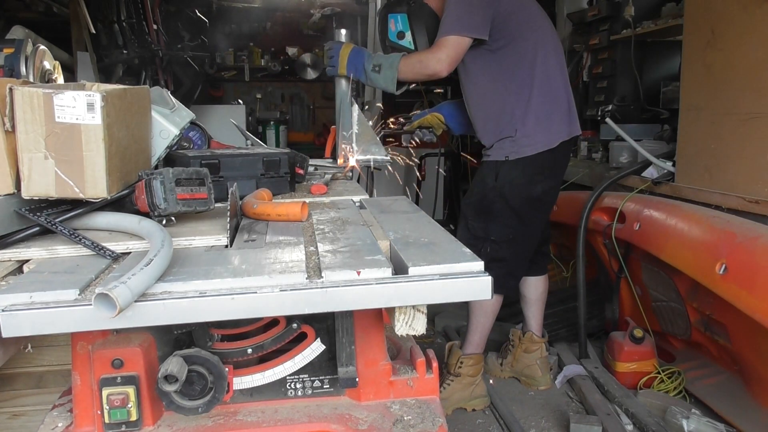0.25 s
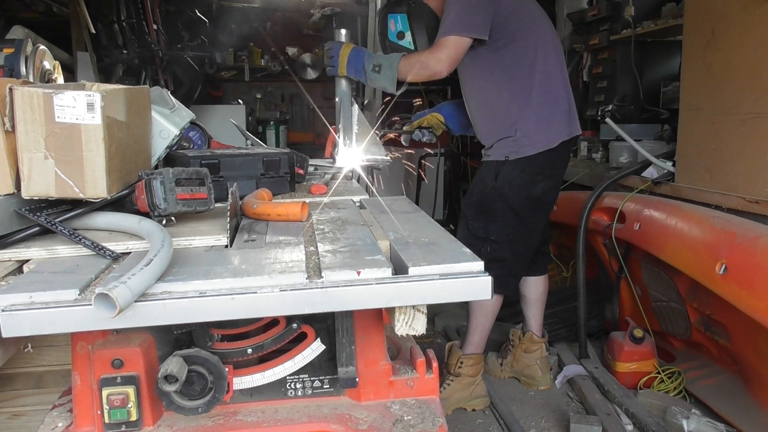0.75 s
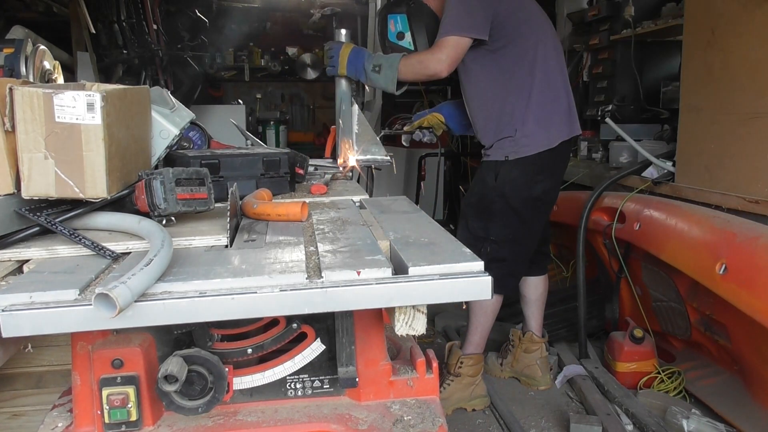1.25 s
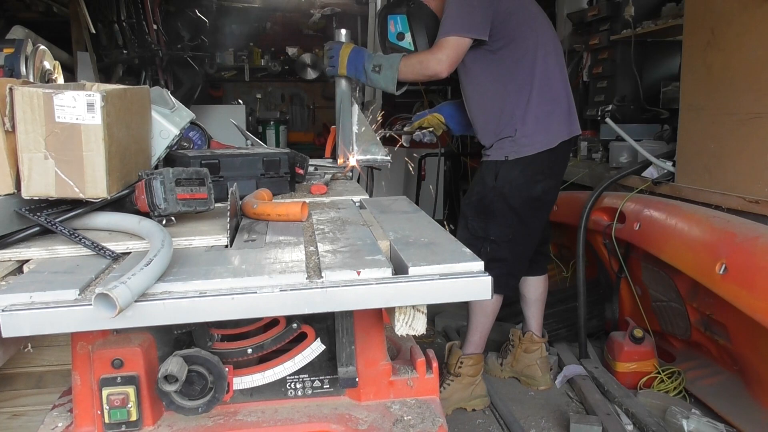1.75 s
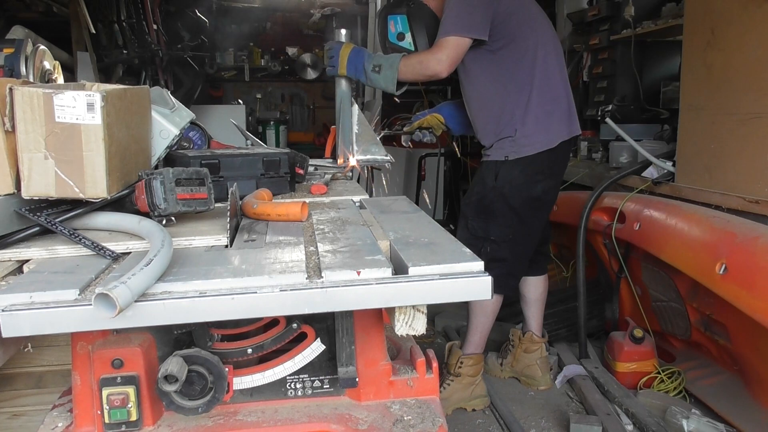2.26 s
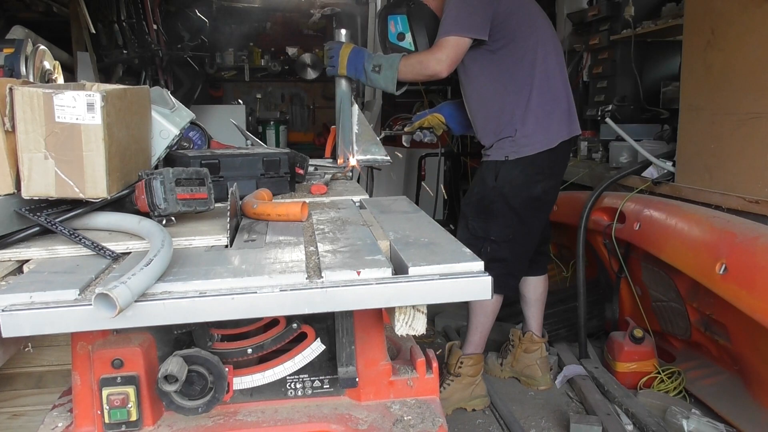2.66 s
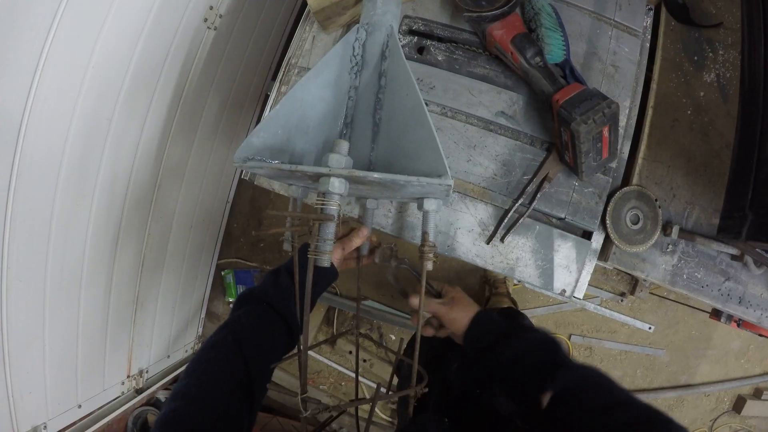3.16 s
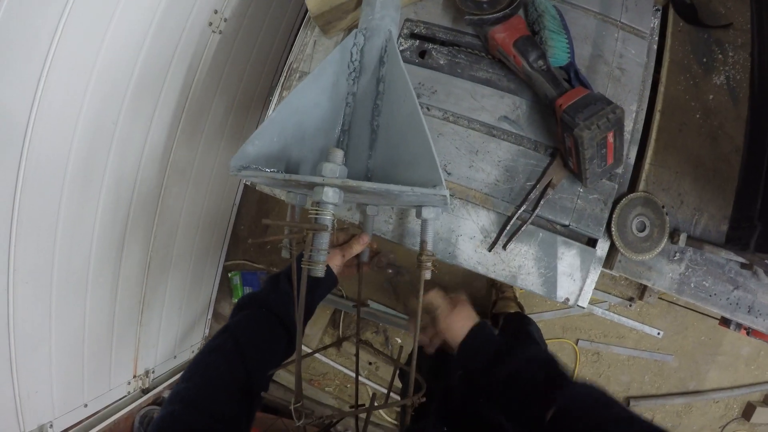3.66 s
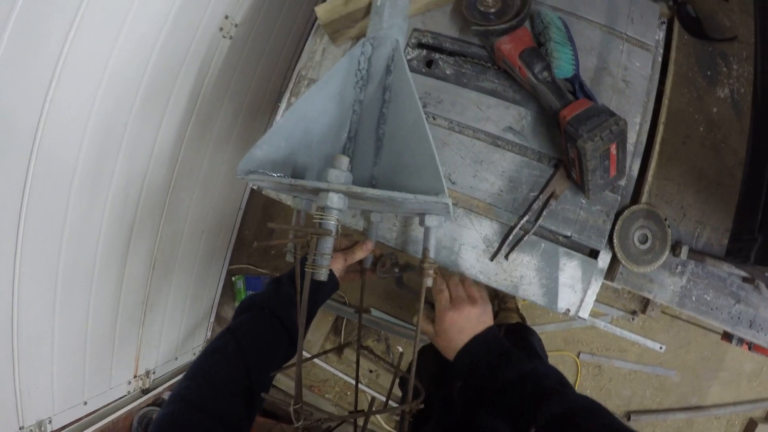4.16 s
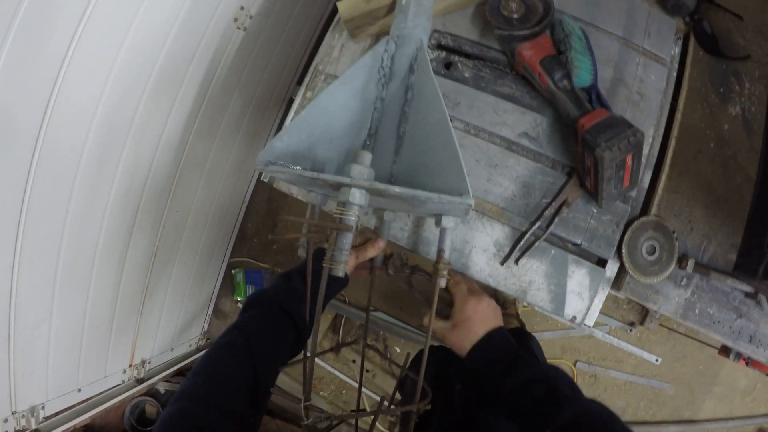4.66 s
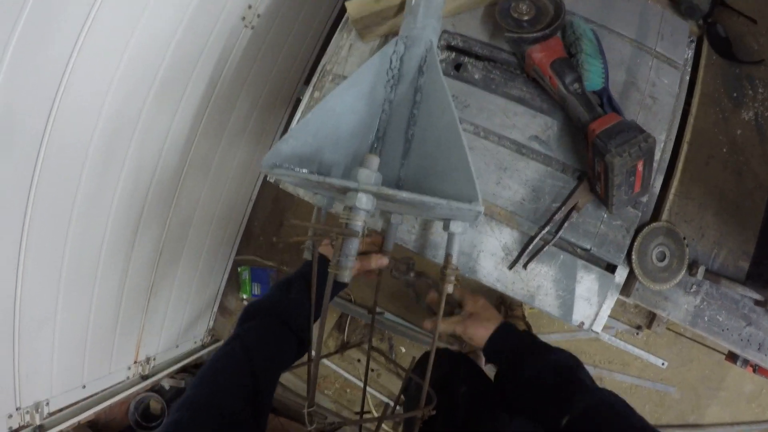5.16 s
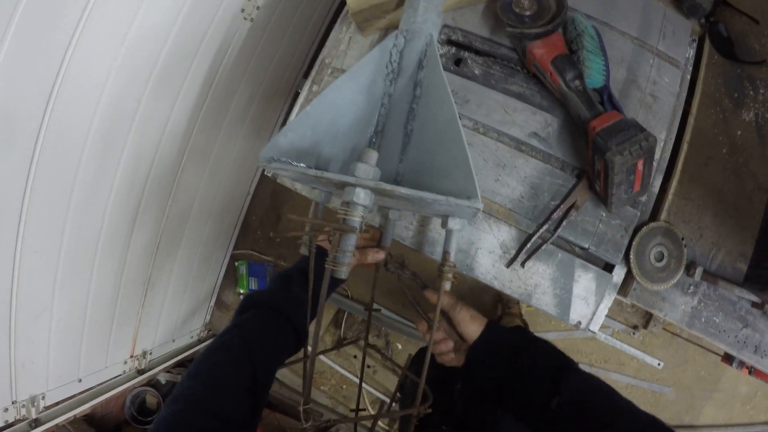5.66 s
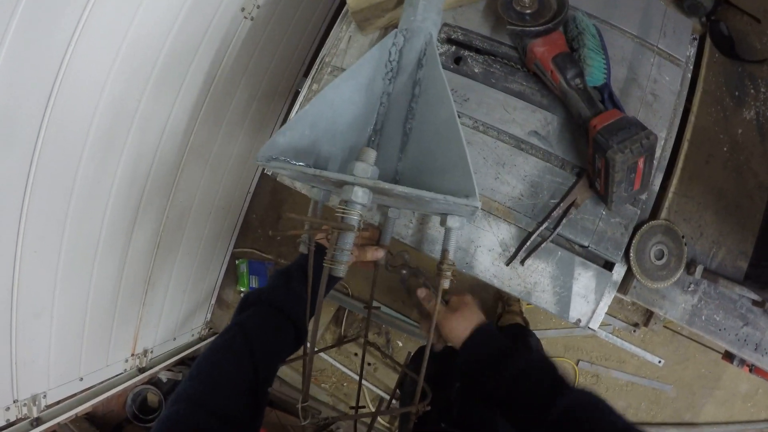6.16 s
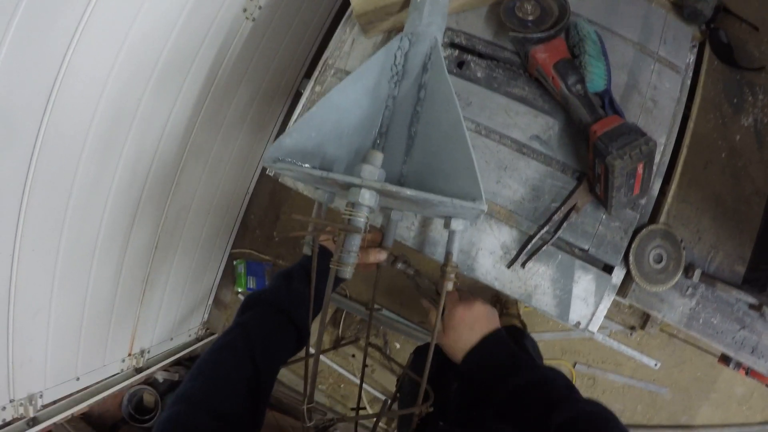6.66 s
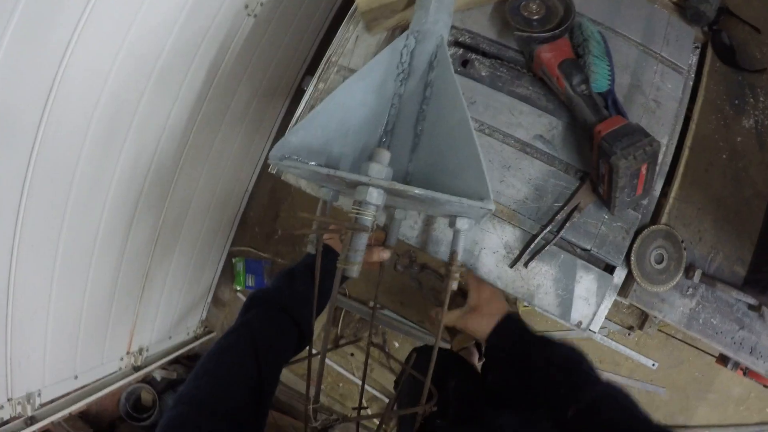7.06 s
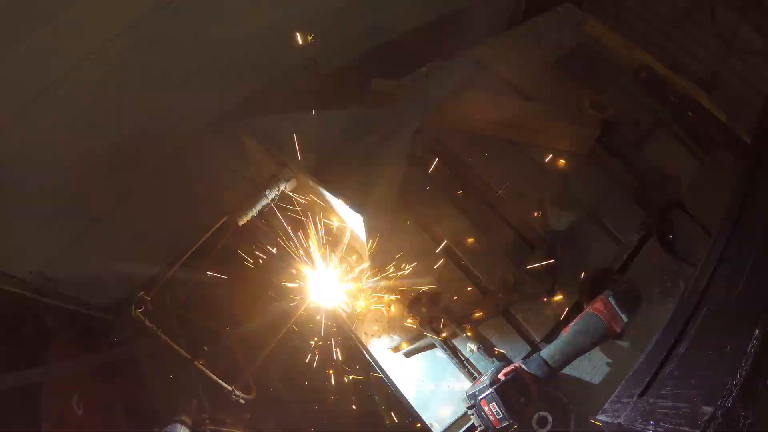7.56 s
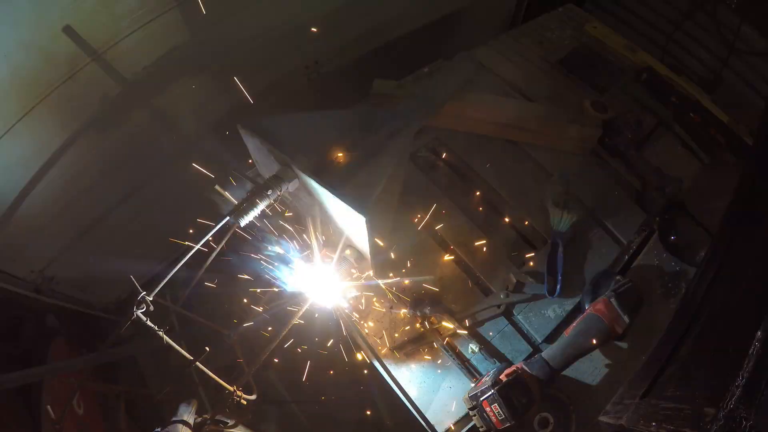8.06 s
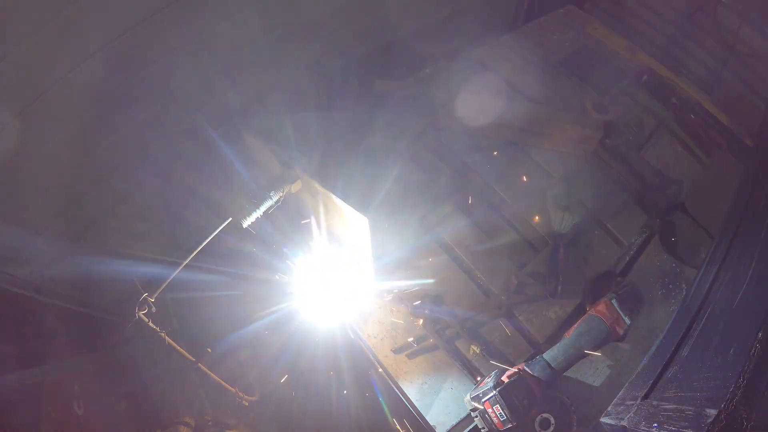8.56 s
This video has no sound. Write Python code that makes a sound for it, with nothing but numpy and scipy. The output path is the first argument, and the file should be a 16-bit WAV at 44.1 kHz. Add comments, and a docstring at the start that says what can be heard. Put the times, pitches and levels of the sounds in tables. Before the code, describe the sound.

Three abrupt shots of metalwork: first irregular electric crackling, sharp snaps and gassy roar with a wavering cooling fan, heard in stereo from across the bench; then near silence with hand-fitted steel knocking, brief scrapes, soft glove scuffs and a dry double tap; finally close mono arc sizzle with crisp cracks, short room reflections and a very faint fan.

```python
"""Stick welding in a garage

Three shots of work on a steel bracket, joined by hard cuts. From across the bench, in stereo, random sparks
and coloured noise make the arc sizzle, roar and snap over the welder's fan. Then a head-worn camera hears in
mono: ringing steel modes and grains of friction are the clinks and scrapes of parts fitted by hand. Last, the
arc crackles again just below that camera, with a bright crack and a lower answer."""
import sys
import numpy as np
from scipy import signal
from scipy.fft import rfft, irfft
from scipy.io import wavfile

SR = 44100
rng = np.random.default_rng(int(sys.argv[2]) if len(sys.argv) > 2 else 0)


def waveform_to_disk(signal):
    """Save audio, clipped to [-1, 1], as 16-bit WAV at the path in sys.argv[1]."""
    frames = np.transpose(np.atleast_2d(signal))
    scaled = np.clip(frames, -1, 1) * 32767
    samples = np.round(scaled).astype(np.int16)
    wavfile.write(sys.argv[1], SR, samples)


N = 388080
TIME = np.arange(N) / SR
CUT_TO_FITTING_S, CUT_TO_CLOSE_S = 3.013, 7.213


def undb(db):
    """Decibels to gain."""
    return 10 ** (np.asarray(db) / 20)


def unit(x):
    """Scale to rms 1."""
    return x / np.sqrt(np.mean(x ** 2))


def unit_energy(x):
    """Scale a response so that it passes white noise at the same level."""
    return x / np.sqrt(np.sum(x ** 2))


def through(x, response):
    """Pass a sound through an impulse response."""
    return signal.fftconvolve(x, response)[:len(x)]


def colour(points, size=4096):
    """Causal minimum-phase response of unit energy, its spectrum drawn through points of f/Hz, level/dB."""
    hz, db = np.transpose(points)
    grid = np.maximum(np.fft.rfftfreq(size, 1 / SR), 1)
    log_gain = np.log(undb(np.interp(np.log(grid), np.log(hz), db)))
    # folding the cepstrum onto positive times makes the response causal
    cepstrum = irfft(log_gain)
    cepstrum[1:size // 2] *= 2
    cepstrum[size // 2 + 1:] = 0
    return unit_energy(irfft(np.exp(rfft(cepstrum))))


def noise(points):
    """Coloured noise of rms 1."""
    return unit(through(rng.standard_normal(N), colour(points)))


def walk(rate, size=2048):
    """Chance that drifts to a new level rate times a second, with an rms of 1."""
    levels = rng.standard_normal(size)
    return unit(np.interp(TIME * rate, np.arange(size), levels))


def fade(t60, size=22050):
    """Exponential decay by 60 dB in t60 seconds."""
    return np.exp(-np.log(1000) * TIME[:size] / t60)


def tail(t60):
    """Dense dying reflections of unit energy."""
    decay = fade(t60)
    return unit_energy(decay * rng.standard_normal(len(decay)))


def swell(start_s, length_s, attack_s, release_s):
    """Rise to 1, hold until length_s after the start, fall back to 0."""
    rise = np.clip((TIME - start_s) / attack_s, 0, 1)
    fall = np.clip(1 - (TIME - start_s - length_s) / release_s, 0, 1)
    return (rise * fall) ** 2


def add(out, s, sound):
    """Mix a sound in at time s."""
    i = int(np.clip(s * SR, 0, N - 1))
    out[i:i + len(sound)] += sound[:N - i]


def stereo(mid, side=0):
    """Left and right from mid and side."""
    return np.array([mid + side, mid - side])


def low_pass(x, hz):
    """Steep top cut."""
    return signal.sosfilt(signal.ellip(8, .2, 70, hz, fs=SR, output="sos"), x)


def resonate(x, hz, width_hz):
    """One resonance with gain 1 at its centre."""
    b, a = signal.iirpeak(hz, hz / width_hz, fs=SR)
    return signal.lfilter(b, a, x)


def sparks(rate, spread_db):
    """Clicks at random, rate a second, of either sign, many small and a few large; rms 1."""
    sizes = undb(spread_db * np.minimum(rng.exponential(size=N), 5))
    struck = rng.random(N) < rate / SR
    return unit(struck * sizes * rng.choice([-1, 1], N))


# still air of the quiet garage [f/Hz, level/dB]
GARAGE_AIR = [(12, -33), (20, -7.5), (45, -13.5), (82, -29), (115, -29), (147, -30.5), (445, -33),
              (484, -33), (555, -37), (753, -36.5), (818, -37.5), (1930, -34.5), (2410, -35),
              (15000, -51.5)]
# low rumble of the head-worn camera [f/Hz, level/dB]
RUMBLE = [(8, -16), (20, 5.0), (30, -1.0), (45, -10.5), (80, -16.5), (160, -30.5), (1000, -86)]
# the head sways with the work of the hands; the rumble grows from its level at the start of the fitting
RUMBLE_DB, RUMBLE_RISE_DB_PER_S = -59.5, 1.67
SWAY_PEAK_S, SWAY_PERIOD_S, SWAY_DB = 4.564, 0.56, 1.5


def garage():
    """Steady air noise, and camera rumble whose level climbs and sways with the head."""
    sway_db = SWAY_DB * np.cos(2 * np.pi * (TIME - SWAY_PEAK_S) / SWAY_PERIOD_S)
    rumble_db = RUMBLE_DB + RUMBLE_RISE_DB_PER_S * (TIME - CUT_TO_FITTING_S) + sway_db
    return undb(-59.5) * noise(GARAGE_AIR) + noise(RUMBLE) * undb(rumble_db)


FAN_HZ = 384.8


def blade_tone(db, wander, waver_db, lead):
    """The fan's tone wavers in the draught and reaches the left port first, by lead radians."""
    hz = FAN_HZ * (1 + wander * walk(25.41))
    phase = 2 * np.pi * np.cumsum(hz) / SR
    return np.sin([phase + lead, phase]) * undb(db + waver_db * walk(12))


# the welder's cooling air [f/Hz, level/dB]
COOLING_AIR = [(25, -21), (60, -8), (120, -2.5), (280, -0.5), (350, 6.5), (430, 2), (550, -1.5),
               (1000, -4.5), (2000, -19.5), (8000, -36)]
# low rush of the same air [f/Hz, level/dB]
LOW_RUSH = [(25, -33), (65, 0.5), (120, 3.5), (250, -6.5), (500, -19.0), (4000, -46.0)]


def welder_fan():
    """Broad air noise and a wavering blade tone from the welder, heard in stereo across the bench."""
    # the low rush is stronger on the right
    rush = noise(LOW_RUSH) * undb([[-62], [-50]])
    air = stereo(undb(-46.0) * noise(COOLING_AIR), undb(-49.5) * noise(COOLING_AIR))
    return air + rush + blade_tone(db=-45.0, wander=0.01344, waver_db=2.0, lead=1.05)


# when gloves and sleeves scuff against the work [t/s, level/dB]
GLOVE_SCUFFS = [(4.24, -69), (4.35, -69), (4.44, -62.5), (4.55, -63), (4.63, -65.5), (5.03, -62.5),
                (5.22, -64.5), (5.35, -66), (6.52, -62.5), (6.799, -62), (6.87, -59)]
# colour of a scuff [f/Hz, level/dB]
GLOVE_COLOUR = [(200, 0), (800, -7), (1250, 6), (1800, 4), (3000, -3.5), (10000, -26)]


def scuffs():
    """Gloves and sleeves brush the work: soft noise in short rounded swells."""
    scuffing = sum(undb(db) * np.exp(-((TIME - s) / 0.023) ** 2) for s, db in GLOVE_SCUFFS)
    return scuffing * noise(GLOVE_COLOUR)


# soft bumps on the camera [t/s, level/dB, f/Hz]
CAMERA_BUMPS = [(5.053, -35.5, 81), (6.334, -45, 99), (6.46, -47, 80), (6.897, -42, 90.5)]


def bumps():
    """Each bump on the camera is a low sine that dies at once."""
    out = np.zeros(N)
    decay = fade(0.045)
    for s, db, hz in CAMERA_BUMPS:
        add(out, s, undb(db) * decay * np.sin(2 * np.pi * hz * TIME[:len(decay)]))
    return out


# a dry double tap close by [t/s, level/dB]
DOUBLE_TAP = [(6.897, -30.5), (6.9015, -20.5)]
# colour of a tap [f/Hz, level/dB]
DRY_TAP_COLOUR = [(100, 4), (450, -5), (750, -24), (1200, -1), (1700, 0), (2300, -12), (4000, -22),
                  (14000, -40)]


def taps():
    """Each tap is a single dry, dull impulse."""
    out = np.zeros(N)
    for s, db in DOUBLE_TAP:
        add(out, s, undb(db) * colour(DRY_TAP_COLOUR))
    return out


# modes the steel rings with [f/Hz, level/dB, t60/s]
STEEL_MODES = [(353, -2, 0.18), (480, -1, .15), (574, 2, 0.45), (1186, -4, 0.073), (1715, 1, 0.15),
               (1868, 1, 0.47), (1930, -7, 1), (2570, 8, .12), (2390, -16, 0.04), (3470, -9, 0.086),
               (3217, 1, 0.063), (3960, -4, 0.083), (4820, 3, 0.13), (5160, -3.5, 0.033), (5900, -2, 0.05),
               (7630, 9, 0.04)]


def steel_ring(clatter_db, clatter_t60):
    """One blow on the steel: its modes, weighted by where it lands, amid a dense short clatter."""
    chance = rng.standard_normal((len(STEEL_MODES), 2))
    ring = 0
    for (hz, db, t60), (weight, shift) in zip(STEEL_MODES, chance):
        decay = fade(t60)
        mode_hz = hz * (1 + 0.0043 * shift)
        mode = decay * np.sin(2 * np.pi * mode_hz * TIME[:len(decay)])
        ring = ring + undb(db + 2 * weight) * unit_energy(mode)
    return unit_energy(unit_energy(ring) + undb(clatter_db) * tail(clatter_t60))


def clink(treble_db, body_db, low_hz, high_hz):
    """A hard contact brings treble, a heavy one body; the spot that is hit favours a low and a high ring."""
    blow = steel_ring(clatter_db=5.0, clatter_t60=0.096)
    low_ring = undb(7.5) * resonate(blow, low_hz, width_hz=180)
    blow = blow + low_ring
    blow = blow + undb(10) * resonate(blow - low_ring, high_hz, width_hz=550)
    contact = colour([(150, body_db + 8), (450, body_db + 21.5), (850, -7.0), (1700, 1), (3000, 3.5),
                      (4500, treble_db + 11), (7900, treble_db + 7.5), (11000, treble_db + 2.5),
                      (15000, treble_db - 9)])
    return unit_energy(through(blow, contact))


# steel parts knock together
# [t/s, relative level/dB, relative treble/dB, relative body/dB, low ring f/Hz, high ring f/Hz]
STEEL_CLINKS = [(3.185, -48.5, -16, -30, 2750, 4670), (3.3776, -57, -2.5, -21, 2980, 6800),
                (3.612, -43, 4, -29, 2990, 8900), (3.718, -47.5, -18, -18, 2760, 4730),
                (3.7624, -47, -16, -29, 1670, 4740), (3.8133, -42.5, -11, -27, 1860, 4350),
                (3.9207, -48.5, -19, -27, 2050, 4720), (4.9292, -38.5, -24, -33.5, 3240, 4920),
                (5.0682, -46, -13, -26, 4440, 4670), (5.125, -54.5, -14, -30, 2760, 7850),
                (5.4974, -40, -11.5, -34, 3420, 5830), (5.6301, -46.5, -26, -15, 2860, 4400),
                (5.7574, -51.5, -15, -24.5, 1800, 6900), (6.039, -53, -11.5, -17, 2120, 5130),
                (6.1818, -44.5, -23, -17.5, 1870, 4330), (6.2886, -46, -13, -17, 2820, 4760),
                (6.6383, -46, -19, -28.5, 1720, 7800)]


def clinks():
    """Parts knock together by hand, each blow with its own hardness, weight and favoured rings."""
    out = np.zeros(N)
    for s, db, treble_db, body_db, low_hz, high_hz in STEEL_CLINKS:
        add(out, s, undb(db + 22.5) * clink(treble_db, body_db, low_hz, high_hz))
    return out


# steel slides on steel
# [start t/s, length to the release/s, level/dB, level/dB of the bracket's groan under a heavy stroke]
STEEL_SCRAPES = [(3.139, 0.053, -56.5, -85), (3.605, 0.071, -46.5, -64.5), (6.182, 0.071, -60, -60)]
# colour of the sliding steel [f/Hz, level/dB]
SLIDE_COLOUR = [(100, -24), (450, -4.5), (800, -14.5), (1800, 6.5), (3000, 7.5), (5000, 3), (9000, -5.5),
                (11000, -10), (15000, -11)]
# colour of the groaning bracket [f/Hz, level/dB]
BRACKET_GROAN = [(150, -18), (300, 0), (460, -2), (750, -10), (1200, -3), (3000, -8), (9000, -42)]
SCRAPE_ATTACK_S, SCRAPE_RELEASE_S = 0.018, 0.037


def scrapes():
    """Grains of friction, swelling with each stroke, excite the ringing steel and the groaning bracket."""
    slips, groan = np.zeros(N), np.zeros(N)
    for s, length_s, db, groan_db in STEEL_SCRAPES:
        stroke = swell(s, length_s, SCRAPE_ATTACK_S, SCRAPE_RELEASE_S)
        slips += undb(db) * stroke
        groan += undb(groan_db) * stroke
    ring = steel_ring(clatter_db=12.5, clatter_t60=0.0086)
    body = unit_energy(through(ring, colour(SLIDE_COLOUR)))
    friction = sparks(rate=810, spread_db=0.0)
    return through(slips * friction, body) + through(groan * friction, colour(BRACKET_GROAN))


def fitting():
    """Hands slide and knock steel parts, which the room answers; scuffs, bumps and taps are close and dry."""
    steel = clinks() + scrapes()
    return steel + undb(-4) * through(steel, tail(0.24)) + scuffs() + bumps() + taps()


# after a short circuit the pool boils up and calms again
BOIL_ATTACK_S, BOIL_T60_S = 0.0044, 0.39


def boiling(snaps):
    """How hard the pool boils: each big short circuit stirs it up, then it calms; the powers add."""
    power = np.zeros(N)
    stir = fade(BOIL_T60_S)
    stir = stir * np.minimum(TIME[:len(stir)] / BOIL_ATTACK_S, 1)
    for s, _, db in snaps:
        add(power, s, (undb(db) * stir) ** 2)
    return np.sqrt(power)


DROP_SCATTER_DB = 1


def drops(snaps, start_s, rate, db, count=60):
    """Short circuits as (t/s, level/dB): the big ones, and small ones at uneven gaps, 1 / rate in the median."""
    gaps, sizes = rng.standard_normal((count, 2)).T
    times = start_s + np.cumsum(np.exp(.5 * gaps)) / rate
    small = [(s, db + DROP_SCATTER_DB * size) for s, size in zip(times, sizes) if s < TIME[-1]]
    return [row[:2] for row in snaps] + small


def discharge(sizzle, snaps, snap_db, spray_db, spray_t60, rate, spread_db, flutter_db):
    """The arc fizzes unevenly; each short circuit bursts with one crack and a dying spray of spatter."""
    cracks, spray = np.zeros(N), np.zeros(N)
    for s, db in snaps:
        add(cracks, s, undb([db + snap_db]))
        add(spray, s, undb(db + spray_db) * fade(spray_t60))
    fizz = sizzle * undb(flutter_db * walk(70))
    clicks = cracks + sparks(rate, spread_db) * np.hypot(fizz, spray)
    # a repeat 4 samples later, of drifting strength and sign, varies the colour from burst to burst
    shape = .45 * np.tanh(walk(150))
    return (clicks + np.roll(clicks * shape, 4)) / np.hypot(1, shape)


# the arc sizzles steadily and sinks as it settles; relative level at the start of each shot
FAR_SIZZLE_DB, CLOSE_SIZZLE_DB, SETTLE_DB_PER_S = -35, -46, 0.5
# the gas roars softly, and more whenever the pool boils
ROAR_DB, ROAR_PER_BOIL_DB = -43.5, -14.5
# once the arc is drawn long and flares: it swells, holds and dies back
FLARE_START_S, FLARE_LENGTH_S, FLARE_ATTACK_S, FLARE_RELEASE_S = 0.758, 0.34, 0.15, 0.18
FLARE_ROAR_DB, FLARE_SIZZLE_DB = -30, -38.5
# small drops fall at random between the big ones; relative level
FAR_DROPS_PER_S, FAR_DROP_DB = 9, -26
# big drops of metal short the far arc [t/s, relative crack level/dB, relative boiling level/dB]
FAR_SHORTS = [(0.0141, -21.5, -44), (0.025, -17.5, -40), (0.0859, -18, -30), (0.1882, -19, -35.5),
              (0.4188, -21, -30), (0.4322, -16.5, -36.5), (0.492, -18, -52), (0.5517, -18.5, -38),
              (0.6746, -19, -29.5), (0.8007, -16.5, -27.5), (0.8586, -15.5, -47), (0.8693, -19, -50),
              (0.9104, -20, -42), (1.0197, -21, -30), (1.1318, -15, -48), (1.2159, -21, -40),
              (1.2957, -19.5, -43), (1.4873, -18, -36), (1.521, -18.5, -45), (1.623, -18, -24),
              (1.73, -16.5, -29), (1.7922, -13.5, -45), (1.8408, -14, -39), (1.9882, -15, -47),
              (2.0384, -18.5, -54), (2.1855, -21.5, -40), (2.196, -18, -48), (2.2391, -19.5, -50),
              (2.2616, -17.5, -53), (2.5416, -24.5, -57), (2.6435, -20.5, -30), (2.7493, -18.5, -36),
              (2.7828, -12.5, -39), (2.9416, -18.5, -35.5)]
# colour of a spark from across the bench [f/Hz, level/dB]
FAR_SPARK_COLOUR = [(200, -27), (900, -9.5), (1500, -23.5), (2000, -9), (2600, -12), (3150, -3.5),
                    (3550, -11.5), (4050, 0), (4800, -6), (6400, -5), (7700, 3), (9700, -1.5),
                    (12500, -8.5), (16000, -18)]
# colour of the roaring gas [f/Hz, level/dB]
GAS_ROAR = [(60, -25.5), (160, -13.5), (400, -3), (520, -9.5), (700, -7), (800, 1.5), (900, 0.5),
            (1200, -13.5), (1700, -10), (1950, -0.5), (2300, -18), (3100, -4.5), (6000, -17.5)]
# how much of the far arc reaches the two microphone ports unalike [f/Hz, level/dB]
PORT_SIDE_COLOUR = [(1000, 0.5), (2500, -7), (5800, -20.5), (7800, -5.5), (15000, 6.5)]


def far_weld():
    """Across the bench the arc sizzles, boils and flares, heard directly, off the bench and from the garage."""
    flare = swell(FLARE_START_S, FLARE_LENGTH_S, FLARE_ATTACK_S, FLARE_RELEASE_S)
    boil = boiling(FAR_SHORTS)
    settling = undb(FAR_SIZZLE_DB - SETTLE_DB_PER_S * TIME)
    sizzle = np.hypot(settling, np.hypot(boil, undb(FLARE_SIZZLE_DB) * flare))
    gas = np.hypot(undb(ROAR_DB), np.hypot(undb(ROAR_PER_BOIL_DB) * boil, undb(FLARE_ROAR_DB) * flare))
    snaps = drops(FAR_SHORTS, 0, FAR_DROPS_PER_S, FAR_DROP_DB)
    arc = discharge(sizzle, snaps, snap_db=18.3, spray_db=-13, spray_t60=.05,
                    rate=2200, spread_db=3.8, flutter_db=1.5)
    arc = through(arc, colour(FAR_SPARK_COLOUR))
    path = undb(-6.0) * tail(0.01) + undb(-3.0) * tail(0.16)
    # the direct wave, then its bounces off the bench top and the clutter beside it
    for lag_s, db in [(0, -4), (.0026, -4), (.0055, -14)]:
        add(path, lag_s, undb([db]))
    # the two ports differ mostly in the top octave
    arc_side = undb(-10.5) * through(through(arc, tail(.05)), colour(PORT_SIDE_COLOUR))
    roar = noise(GAS_ROAR) * gas * undb(2.34 * walk(60))
    roar_side = undb(-20.5) * through(roar, tail(.2))
    return stereo(through(arc, path) + roar, arc_side + roar_side)


CLOSE_DROPS_PER_S, CLOSE_DROP_DB = 12, -33
# big drops of metal short the close arc [t/s, relative crack level/dB, relative boiling level/dB]
CLOSE_SHORTS = [(7.254, -26.5, -57), (7.3243, -23.5, -53), (7.4414, -25, -59), (7.5123, -33.5, -46),
                (7.6143, -30, -43), (7.6717, -27.5, -43.5), (7.7477, -26.5, -56), (7.755, -29, -57),
                (7.788, -28.5, -47), (7.7966, -28.5, -56), (7.8605, -27, -63), (7.964, -24.5, -44),
                (8.221, -27, -63), (8.3023, -31.5, -56), (8.5584, -33, -64), (8.7205, -29.5, -61)]
# colour of a spark as the bracket and the room answer it [f/Hz, level/dB]
CLOSE_SPARK_COLOUR = [(200, -20), (1020, -23), (1150, 0), (1550, -7.5), (1750, -10), (2350, -1), (2900, -6),
                      (3450, 0), (3750, -9.5), (4300, -9.5), (4700, 3), (6200, -8), (9800, -10.5),
                      (15000, -18)]
# the first wave of a crack, before any surface has coloured it [f/Hz, level/dB]
FIRST_WAVE = [(300, -27), (3900, -20), (5000, 10.5), (7500, -0.5), (9700, 3.5), (10900, -11.5), (12200, 1),
              (13400, -11), (14800, -29)]


def close_weld():
    """Arc at arm's length: a bright crack, then the bracket and the room answer lower; the fan is far behind."""
    settling = undb(CLOSE_SIZZLE_DB - SETTLE_DB_PER_S * (TIME - CUT_TO_CLOSE_S))
    sizzle = np.hypot(settling, boiling(CLOSE_SHORTS))
    snaps = drops(CLOSE_SHORTS, CUT_TO_CLOSE_S, CLOSE_DROPS_PER_S, CLOSE_DROP_DB)
    arc = discharge(sizzle, snaps, snap_db=18, spray_db=-24, spray_t60=.04,
                    rate=2600, spread_db=3.6, flutter_db=1.2)
    direct = undb(-2.5) * through(arc, colour(FIRST_WAVE))
    answer = through(undb(-4) * tail(0.012) + undb(-7.5) * tail(0.22), colour(CLOSE_SPARK_COLOUR))
    hum = blade_tone(db=-68, wander=.008, waver_db=2, lead=0)[0]
    return direct + through(arc, answer) + hum


def scene():
    """The three shots, cut together: stereo across the bench, then the head-worn camera in mono."""
    bench = far_weld() + welder_fan()
    head = garage() + fitting() + close_weld() * (TIME >= CUT_TO_CLOSE_S)
    return np.where(TIME < CUT_TO_FITTING_S, bench, stereo(low_pass(head, 15400)))


def record(dry):
    """The microphone's top is cut at 16100 Hz."""
    return low_pass(dry, 16100)


dry = scene()
out = record(dry)
waveform_to_disk(out)
```